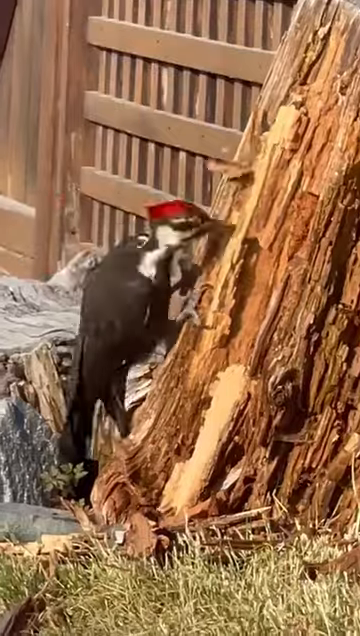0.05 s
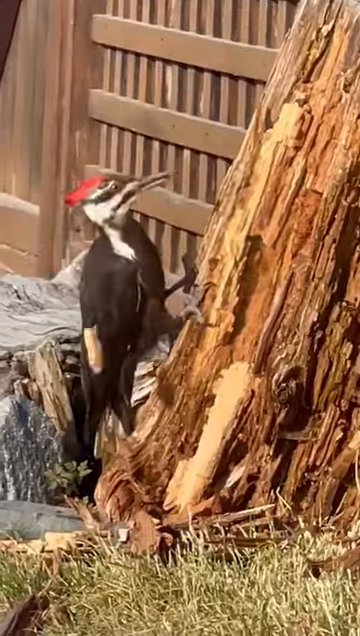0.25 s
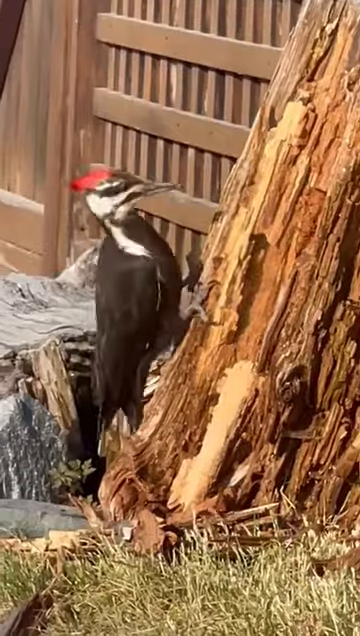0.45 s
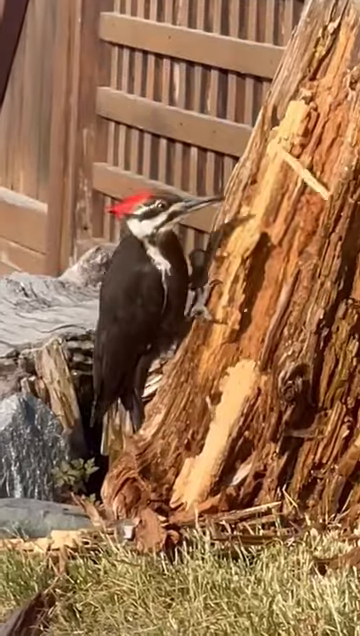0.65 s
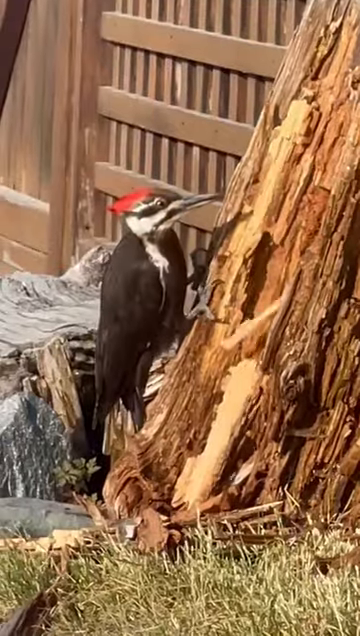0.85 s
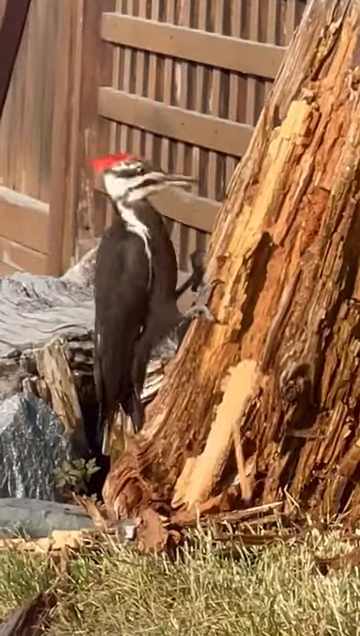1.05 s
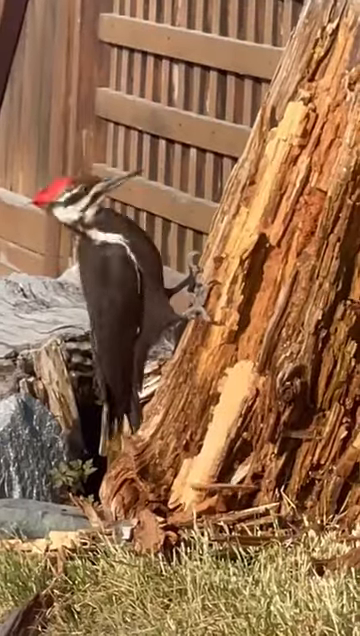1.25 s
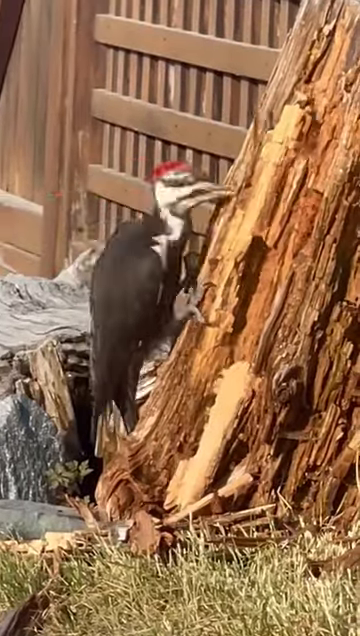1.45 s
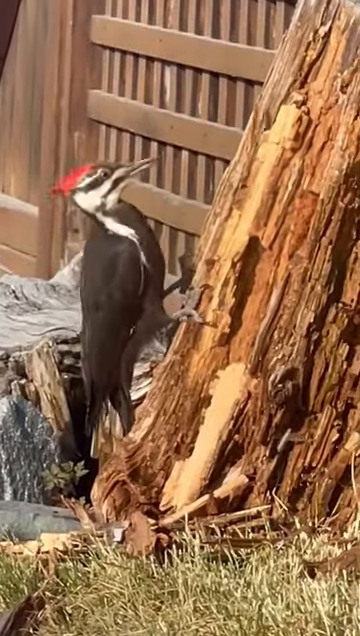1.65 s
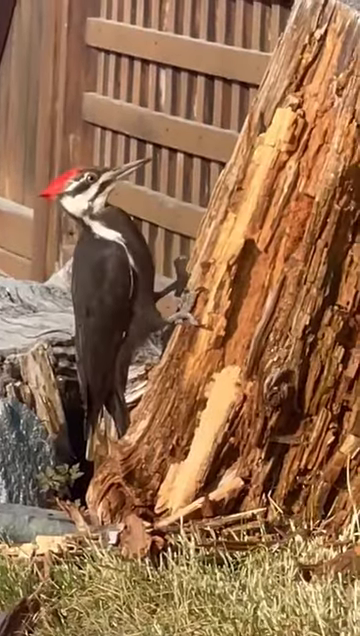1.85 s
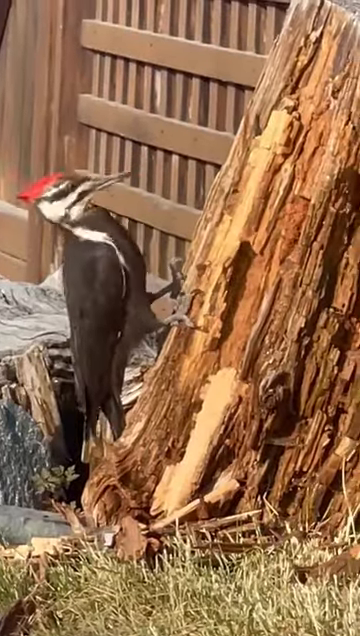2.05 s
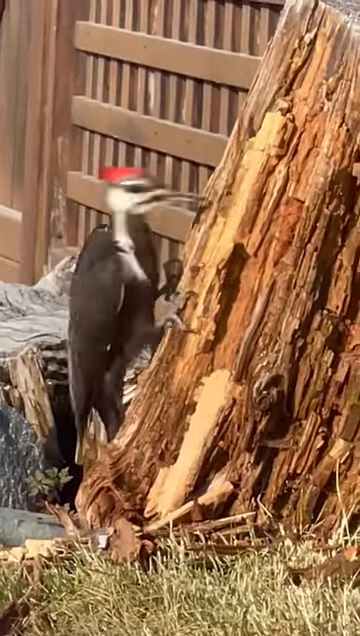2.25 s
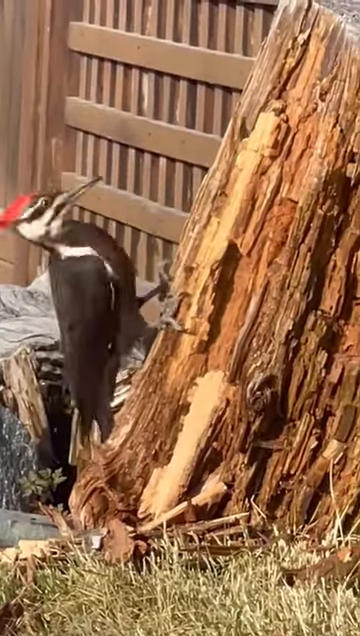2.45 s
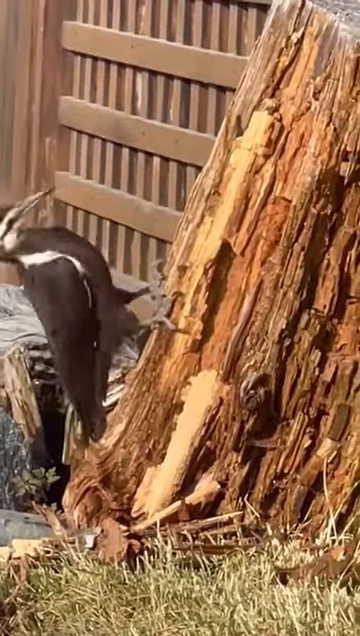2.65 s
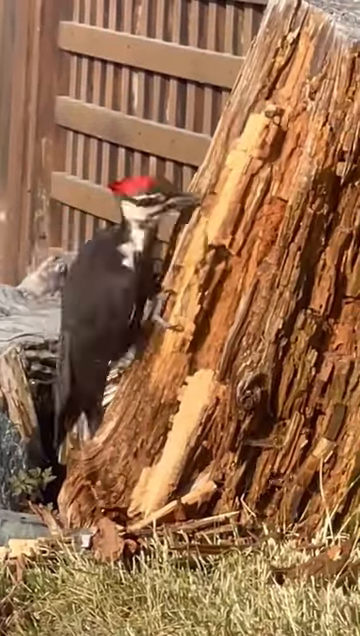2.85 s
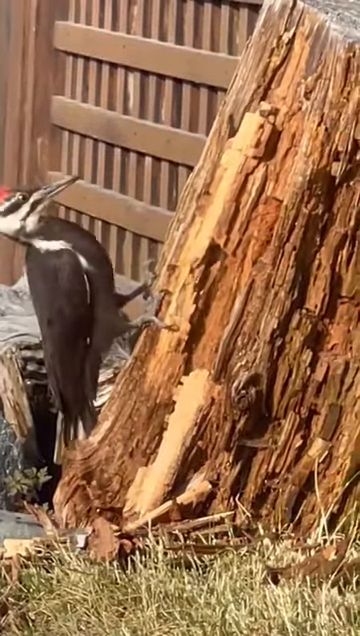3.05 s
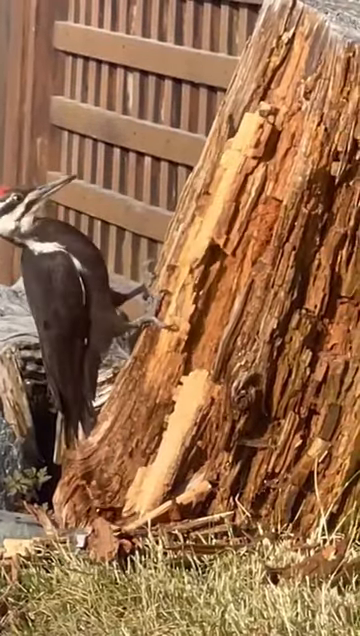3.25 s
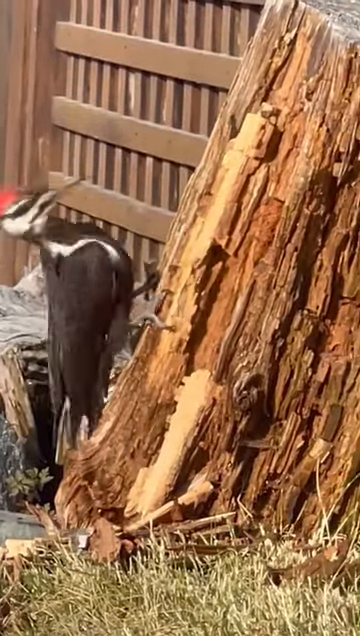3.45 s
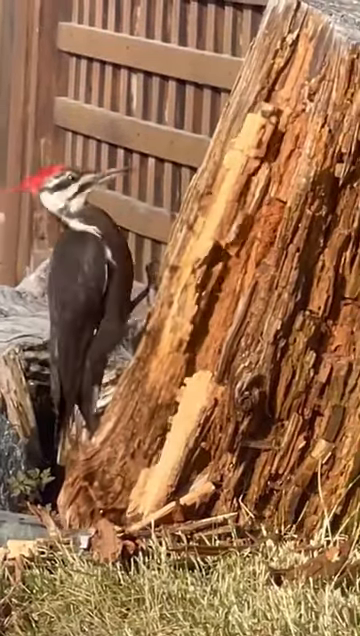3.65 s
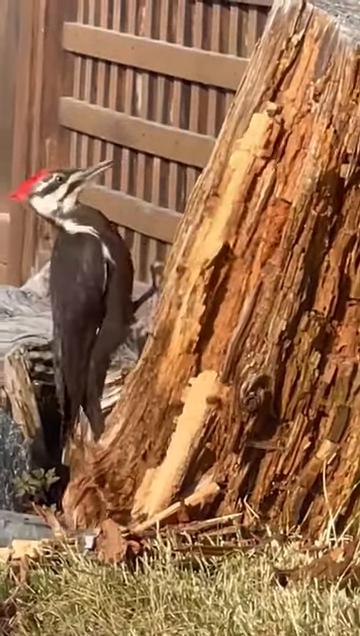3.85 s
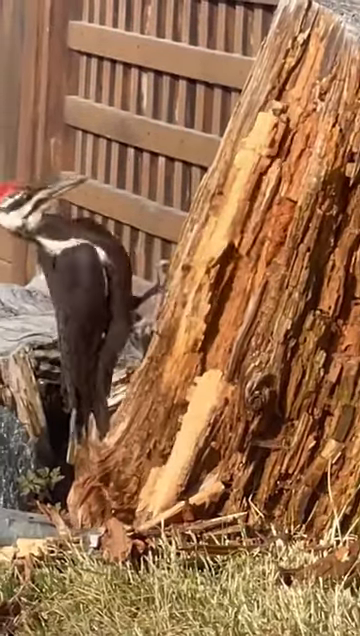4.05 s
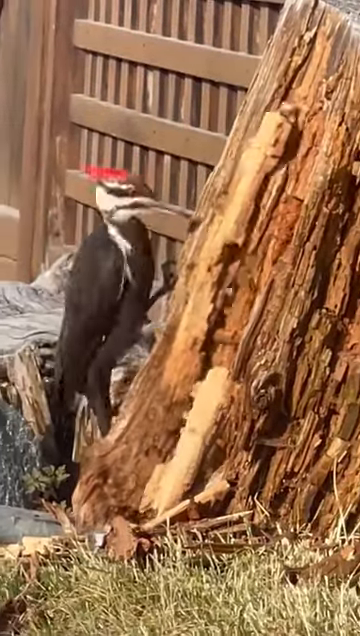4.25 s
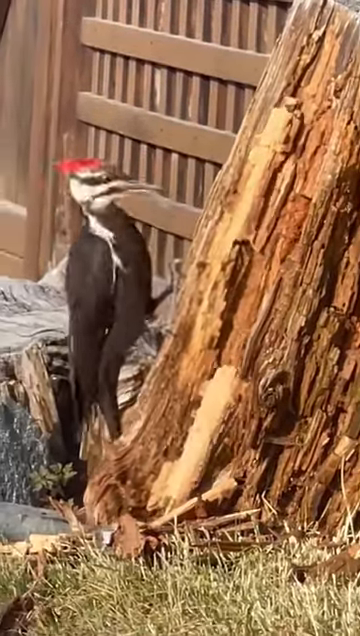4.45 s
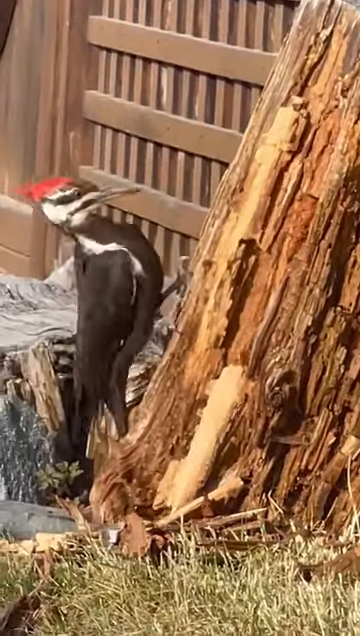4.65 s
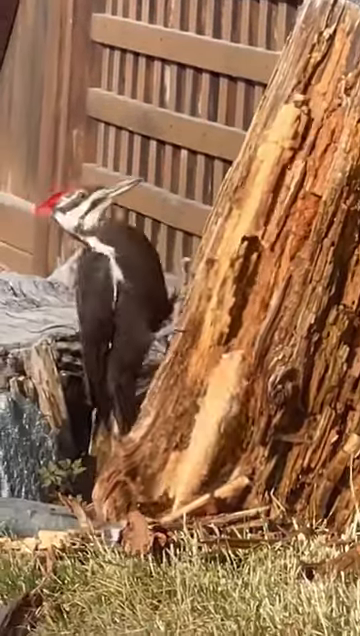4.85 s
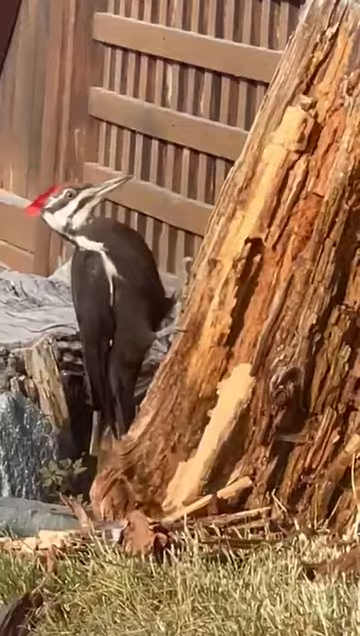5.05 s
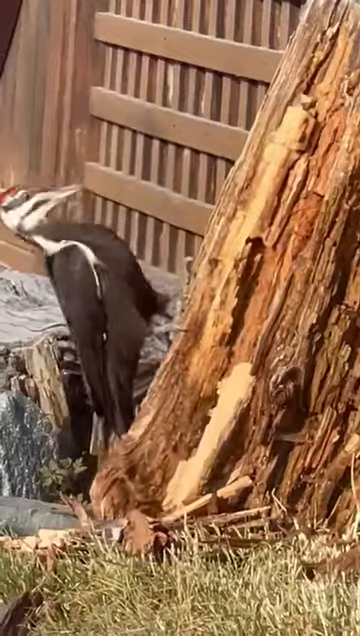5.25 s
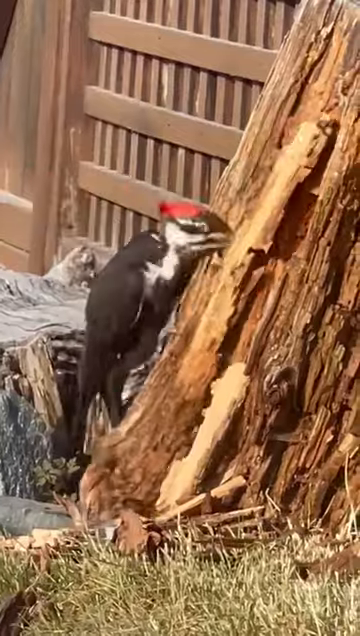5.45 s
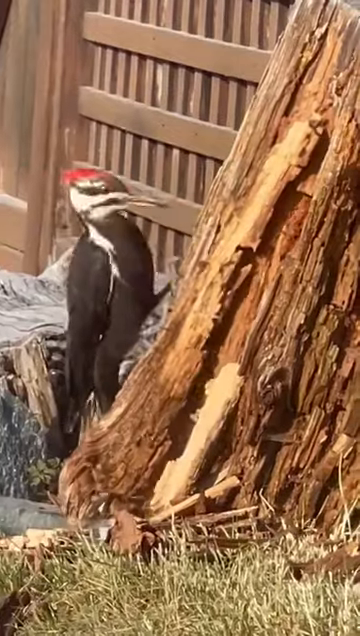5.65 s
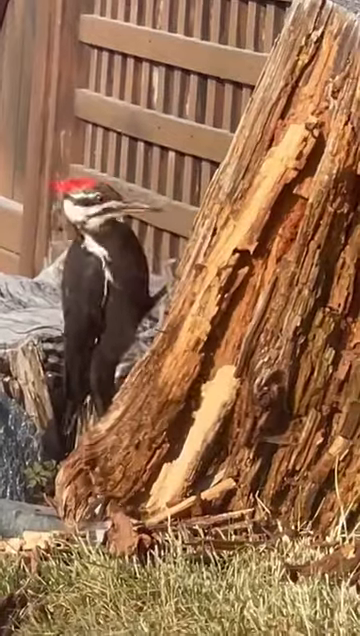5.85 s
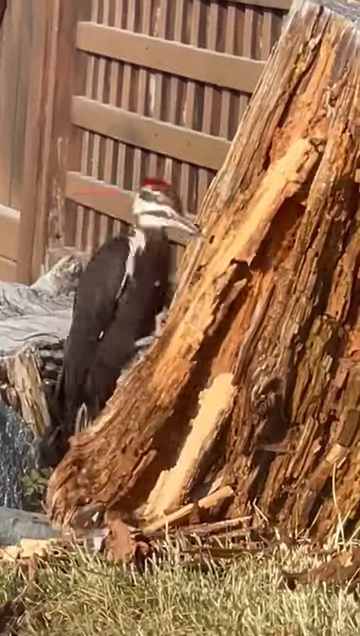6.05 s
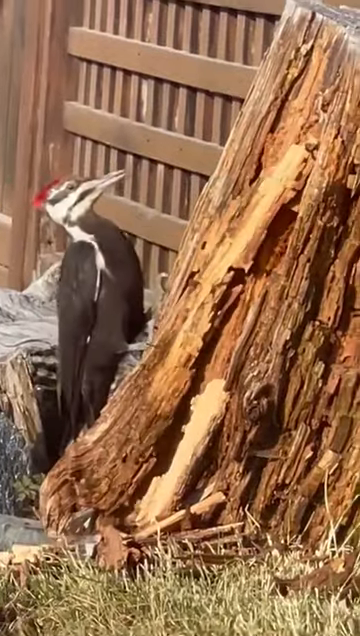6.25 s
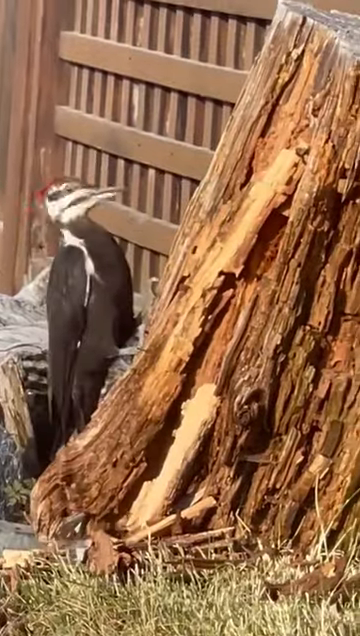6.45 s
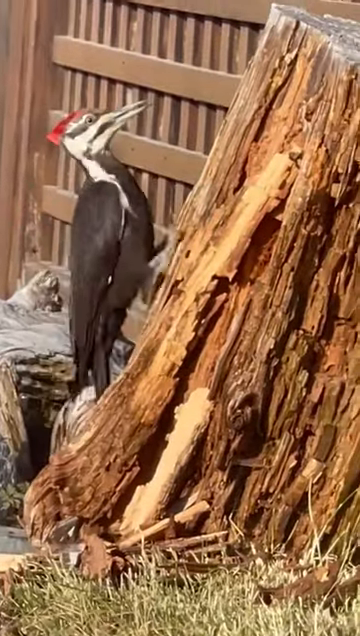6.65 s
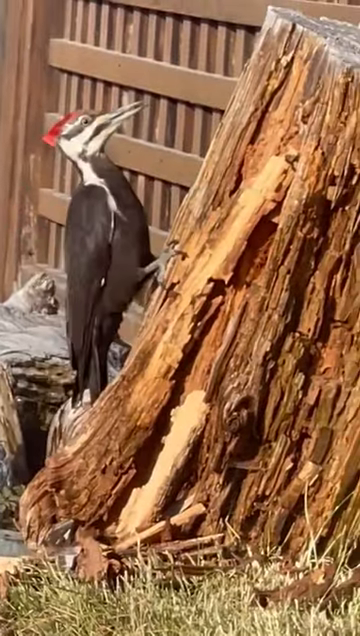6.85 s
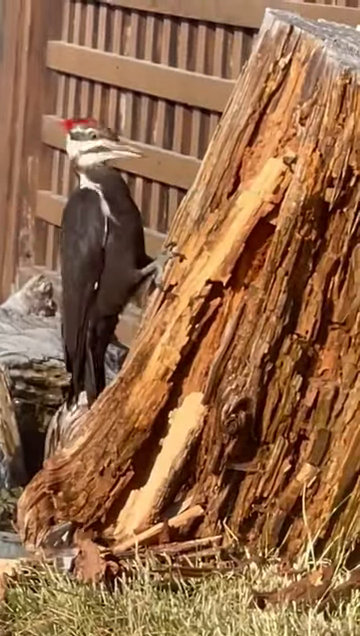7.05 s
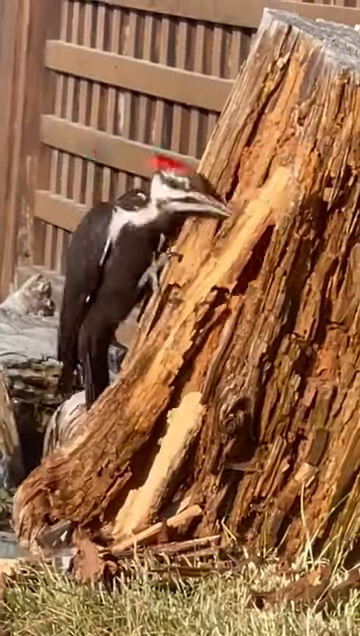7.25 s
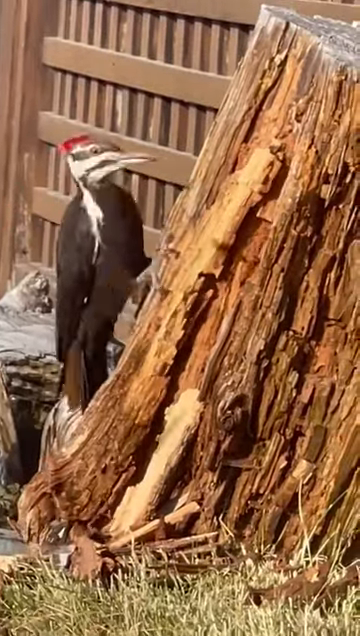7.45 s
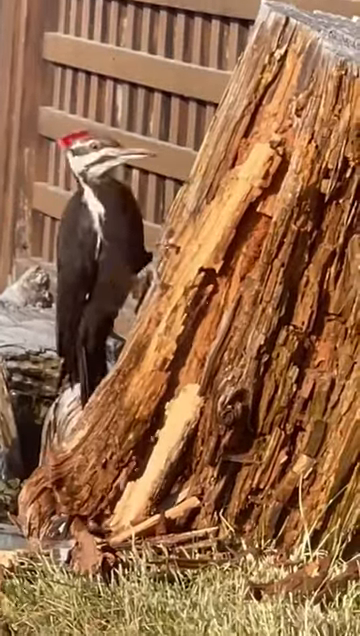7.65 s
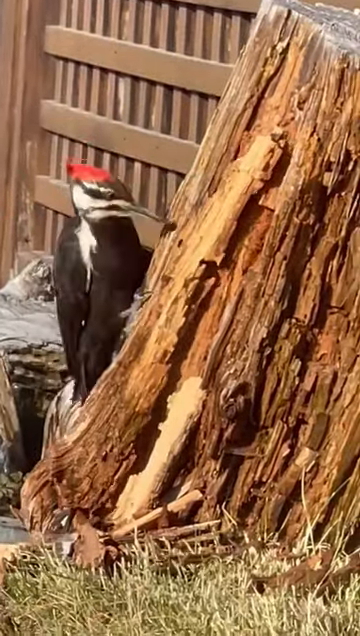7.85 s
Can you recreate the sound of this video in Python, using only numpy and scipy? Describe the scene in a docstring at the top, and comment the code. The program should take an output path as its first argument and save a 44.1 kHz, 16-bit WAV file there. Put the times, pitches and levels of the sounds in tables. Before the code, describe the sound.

In a quiet fenced yard, a large woodpecker chops a rotten stump a few metres from a hand-held phone. The hardest, brightest crack comes at 0.1 s, then a lighter peck at 0.6 with splintery ticks. A tiny tock falls near 1.0. Duller, solid knocks follow at 1.5 and 2.4, a bright double hit at 2.9, then blows at 3.6, 4.2, 4.8, 5.5 and a snappy cluster around 6.1. After a pause with faint ticks, a last weaker knock lands at 7.35. Each is short and damped, with fibres snapping, chips crumbling and trickling down, and a brief fence echo. Faint whistles pass between 1.3 and 3.5; a distant bird calls softly around 4.6-5.1, 6.2-6.6 and 7.3-7.9. Low breeze and faint murmur continue throughout, with a phone bump at 4.9 and soft hand rubs from 4.8 onward.

```python
"""A large woodpecker chops into a rotten stump in a fenced yard, a few metres from a hand-held phone.
Blows ring damped wood modes; snapping fibres and trickling crumbs are short shaped noise bursts.
The fence's echo is a train of sparse taps; a far bird, a short tock and faint whistles are gliding partials.
Behind them lie breeze rumble, a few nudges and rubs of the phone, and murmur, rustle and fizz of noise."""
import sys
import numpy as np
from scipy import signal
from scipy.fft import rfft, irfft, next_fast_len
from scipy.io import wavfile
from scipy.ndimage import uniform_filter1d

SR = 44100
rng = np.random.default_rng(int(sys.argv[2]) if len(sys.argv) > 2 else 0)


def master_out(mix):
    """Clip the mix to full scale and print it as 16-bit PCM to the path in sys.argv[1]."""
    frames = np.transpose(np.atleast_2d(mix))
    ceiling = np.clip(frames, -1, 1)
    pcm = np.round(ceiling * 32767).astype(np.int16)
    wavfile.write(sys.argv[1], SR, pcm)


def voltage_ratio(decibels):
    """Convert decibels (scalar or array-like) to amplitude ratios, 20 dB per decade."""
    exponent = np.asarray(decibels, float) / 20
    return 10 ** exponent


N = 348831  # length in samples


def evened(x):
    """Scale to an rms of one."""
    return x / np.sqrt(np.mean(x ** 2) + 1e-20)


def peaked(x):
    """Scale to a peak of one."""
    return x / (abs(x).max() + 1e-20)


def wandering(noise, span):
    """Smooth noise twice over span samples into a slow drift with an rms of one."""
    return evened(uniform_filter1d(uniform_filter1d(noise, span), span))


def read(points, hz):
    """Read a curve of (Hz, value) points along a logarithmic pitch axis."""
    f, value = np.transpose(points)
    return np.interp(np.log(hz + 1), np.log(f + 1), value)


def brightness_tilt(db_per_octave, hz):
    """Tilt a spectrum about 5 kHz, levelling off two octaves to either side."""
    return db_per_octave * np.clip(np.log2((hz + 1) / 5000), -2, 2)


def add(mix, start_s, sound):
    """Lay a sound into the mix in place."""
    part = mix[max(round(start_s * SR), 0):][:len(sound)]
    part += sound[:len(part)]


def spells(rows, t, falls=1):
    """Summed power of events that rise, then die away; falls multiplies the rate of dying."""
    start, rise, db, fall = np.transpose(rows)[:, :, None]
    rising = np.clip((t - start) / rise, 0, 1)
    falling = voltage_ratio(db - falls * fall * np.maximum(t - start - rise, 0))
    return ((rising * falling) ** 2).sum(0)


# bill meets wood: start_s, level_db, hardness_db_per_octave (about 400 Hz)
BLOWS = [(0.106, -20, 2), (0.445, -55, 8), (0.601, -40, 3), (1.523, -23.5, -4.5), (2.094, -53, -2.5),
         (2.356, -23.5, -.5), (2.908, -32.5, -0.5), (2.924, -22.5, 2), (3.58, -28, -3.5),
         (4.222, -31.5, -4), (4.231, -25, -2), (4.784, -34, -1), (5.518, -27.5, -2.5), (5.641, -47, 1),
         (6.06, -49, 0), (6.077, -37, -4.5), (6.111, -35.5, -4), (7.352, -34, -0.5)]
# damped modes of the stump: pitch_hz, level_db, t60_s
STUMP_MODES = [(87, -15, 0.17), (120, -8.5, 0.081), (154, -7.5, .12), (215.5, -2, 0.086),
               (277.6, 6.5, 0.04), (325, 1, .055), (370, -8, 0.04), (425.1, -2, 0.039), (511, 1.5, 0.016),
               (639, -0.5, 0.039), (734, -3.5, 0.029), (786, -3.5, 0.059), (977, -3, .03),
               (1128, -3.5, .03), (1230, -5, 0.0095), (1644, -5, 0.046), (1985, -2.5, 0.018),
               (2300, -5, 0.017)]


def knocks():
    """While the bill digs in, the damped modes of the stump are set off one by one; each spot tunes them anew."""
    dig_in_s = 0.002  # spread of the mode onsets
    out, t = np.zeros(N), np.arange(8192) / SR
    hz, mode_db, t60 = np.transpose(STUMP_MODES)[:, :, None]
    luck = rng.standard_normal((len(BLOWS), 4, len(STUMP_MODES), 1))
    for (start, db, hard_db), (shift, weight, side, wait) in zip(BLOWS, luck):
        spot_db = 1.8 * weight
        level_db = mode_db + hard_db * np.log2(hz / 400) + spot_db
        since = np.maximum(t - abs(wait) * dig_in_s, 0)
        spot_hz = hz * (1 + 0.019 * shift)
        fading = voltage_ratio(level_db - 60 * since / t60)
        rings = np.sign(side) * fading * np.sin(2 * np.pi * spot_hz * since)
        together = np.sqrt((voltage_ratio(level_db) ** 2).sum())  # modes out of step add as powers
        add(out, start, voltage_ratio(db) * rings.sum(0) / together)
    return out


# fibres snap, chips land, claws tick: start_s, peak_db, brightness_db_per_octave
SNAPS = [(0.1059, -10.5, 5.5), (0.4152, -41, 9.5), (0.4465, -63, -21), (0.466, -55, 3.5), (0.4983, -52, 16),
         (0.6019, -25, 6.5), (0.6085, -29, -2), (0.6148, -24, 7), (0.622, -41, 13), (0.6495, -44.5, -1.5),
         (0.8695, -48, -1.5), (0.985, -63.5, -16), (1.0028, -48.5, 10.5), (1.5235, -23.5, -2),
         (1.5337, -26, 14), (1.5739, -35.5, 1), (1.5992, -42.5, -1.5), (1.6511, -43, -1), (2.0865, -58, 0),
         (2.3563, -20, -1.5), (2.3668, -27, 13), (2.3928, -36.5, -8), (2.4092, -44, 0), (2.4174, -33, 2),
         (2.4591, -47.5, -3.5), (2.634, -55, -16), (2.9074, -25.5, 5), (2.9254, -19.5, 2.5),
         (2.934, -34.5, -2), (3.581, -25.5, -0.5), (3.5928, -30.5, -2), (3.6085, -32.5, 9.5),
         (3.6804, -43, -4), (3.6886, -42.5, 2), (3.7964, -50, -5.5), (4.1506, -53, 15),
         (4.2217, -35.5, -9.5), (4.2285, -25.5, 4), (4.2357, -31, -1), (4.274, -37.5, -2),
         (4.301, -46.5, 15), (4.3274, -53, 0), (4.3748, -38, -6), (4.3823, -54, -2), (4.4023, -52, -1),
         (4.4352, -50, -5.5), (4.5066, -52, -6), (4.613, -53, -9), (4.741, -54.5, -10), (4.785, -22, 1),
         (4.8156, -40.5, 6), (4.8558, -36, -2.5), (4.8667, -38, -7.5), (4.9344, -45.5, -3), (4.95, -54, -4),
         (5.5182, -27.5, -0.5), (5.532, -37, -3), (5.5453, -48, 16), (5.6168, -41.5, 20.5),
         (5.6279, -43, 4), (5.6416, -50.5, 4), (5.6572, -47, 2), (5.7527, -58.5, 0.5), (5.87, -59.5, 6),
         (6.0791, -35.5, 2), (6.0964, -15, 3.5), (6.111, -43.5, -12.5), (6.141, -40.5, 3),
         (6.1773, -51, -7.5), (6.705, -50.5, -6.5), (6.7515, -45.5, -4), (6.7628, -44, 4),
         (6.7976, -45, -7), (7.12, -63, 6), (7.2543, -52.5, -10.5), (7.328, -52, -8), (7.346, -28, -2),
         (7.3557, -31, 0.5), (7.4078, -43.5, 6.5), (7.4137, -38, 8.5), (7.48, -56.5, -0.5),
         (7.565, -62.5, -9.5), (7.655, -50.5, 23.5), (7.794, -47.5, 3), (7.8194, -52.5, 2),
         (7.8741, -42, -2.5)]
# spectrum of a snap before its tilt: pitch_hz, level_db
SNAP_COLOUR = [(500, -14.5), (1500, -5.5), (3000, -1), (5500, 0), (7000, -8), (10000, 5), (11300, -3),
               (12500, -46.5)]


def snaps():
    """Each snap is a quick-rising burst of uneven crackle, tilted bright or dull."""
    out, t, hz = np.zeros(N), np.arange(4096) / SR, np.fft.rfftfreq(4096, 1 / SR)
    rows = SNAPS + trickle()
    noise = rng.standard_normal((len(rows), 2, 4096))
    for (start, db, bright_db), (crackle, lumps) in zip(rows, noise):
        t60 = max(0.012 * (1.5 - 0.09 * bright_db), 0.003)  # seconds; a duller snap rings longer
        patchy_db = 3.2 * wandering(lumps[:len(hz)], 40)  # every splinter has its own ring
        colour_db = read(SNAP_COLOUR, hz) + brightness_tilt(bright_db, hz) + patchy_db
        burst = irfft(rfft(crackle) * voltage_ratio(colour_db))
        envelope = (1 - np.exp(-t / 0.00058)) * voltage_ratio(-60 * t / t60)
        add(out, start, voltage_ratio(db) * peaked(burst * envelope))
    return out


# loose chips slide down the stump into the grass: start_s, rise_s, rustle_level_db, fall_db_per_s
SLIDES = [(0, 0.0081, -85, 58), (1.25, 0.23, -90, 20), (2.2, 0.11, -90, 12), (3.65, 0.14, -81.5, 51.5),
          (4.27, .08, -77.5, 33.5), (4.82, 0.11, -76, 120), (4.5, 0.083, -93, 30), (5.02, 0.023, -82, 55),
          (5.28, 0.035, -96, 74.5), (5.5, 0.047, -79, 59.5), (6.15, 0.036, -90.5, 32), (6.5, 0.06, -85, 51),
          (7.2, 0.097, -90.5, 42)]


def slides(t):
    """Power of the sliding chips, each slide rising and then dying away."""
    return spells(SLIDES, t)


def trickle():
    """Stray crumbs at random moments, their loudness following the slide they fall from."""
    per_s, over_slide_db, spread_db, tilt_db = 70, 16, 3.5, 11
    when, size, tilt = rng.random((round(per_s * N / SR), 3)).T
    start = when * N / SR
    slide_db = 10 * np.log10(slides(start) + 1e-12)
    db = slide_db + over_slide_db - spread_db * np.log(size + .02)
    return list(zip(start, db, tilt_db * (2 * tilt - 1)))


# rotten wood crumbling after a blow or under the claws:
# start_s, starting_level_db, length_s, fall_db over the length (negative swells), brightness_db_per_octave
CRUMBLES = [(0.094, -41, .15, 38, -2.5), (.4, -71.5, 0.072, 6.5, -1.5), (0.598, -48, .18, 40.5, -2.5),
            (1.524, -46.5, .11, 25, -3.5), (2.356, -50, .1, 17, -4), (2.906, -40.5, .14, 35.5, -2.5),
            (3.581, -51, 0.18, 22, -2.5), (4.224, -47.5, 0.14, 25, -0.5), (4.785, -50, 0.043, -3, -1),
            (5.517, -51.5, 0.19, 28, -1), (6.074, -50.5, .17, 25, -2), (6.74, -67, 0.1, 11.5, -1.5),
            (7.243, -64, .0284, 9.5, 1), (7.343, -47.5, .088, 20, 0.5), (7.635, -74.5, .071, 1, 0.5),
            (7.785, -74.5, .18, -14.5, 1.5)]
# spectrum of the crumbling before its tilt: pitch_hz, level_db
CRUMB_COLOUR = [(150, -24), (350, 12.5), (800, 2), (1600, 0.5), (3000, -3), (5500, -1), (7000, -5),
                (10000, 4.5), (11300, 0.5), (12500, -32)]


def crumbles():
    """A dense hiss of splinters with lumps of a few milliseconds; its level slides, then it stops."""
    out, hz = np.zeros(N), np.fft.rfftfreq(8192, 1 / SR)
    noise = rng.standard_normal((len(CRUMBLES), 2, 8192))
    for (start, db, length, fall_db, bright_db), (splinters, lumps) in zip(CRUMBLES, noise):
        colour_db = read(CRUMB_COLOUR, hz) + brightness_tilt(bright_db, hz)
        hiss = evened(irfft(rfft(splinters) * voltage_ratio(colour_db)))
        u = np.arange(8192) / SR / length  # share of the length gone by
        lumps_db = 2.8 * evened(uniform_filter1d(lumps, 150))
        fade = np.clip(u / 0.044, 0, 1) * np.clip((1 - u) / 0.059, 0, 1)
        add(out, start, hiss * voltage_ratio(db - fall_db * u + lumps_db) * fade)
    return out


# how fast the yard's echo dies: pitch_hz, t60_s
YARD_DECAY = [(100, 0.62), (300, 0.19), (1000, 0.15), (3000, 0.17), (10000, 0.08)]


def yard(x):
    """Fence and walls: sparse taps of random sign, each band dying at its own speed; part comes from the sides."""
    apart = 0.22  # weight of the echo that differs between left and right
    taps = np.zeros((2, SR // 2))
    at = np.arange(300, SR // 2 - 20, 20)  # samples; one tap at random in each slot
    spots = at + rng.integers(0, 20, (len(at), 2)).T
    signs = rng.choice([-1., 1.], (len(at), 2)).T
    np.put_along_axis(taps, spots, signs, axis=1)
    hz, t, z = signal.stft(taps, SR, nperseg=256)
    t60 = np.maximum(read(YARD_DECAY, hz), .02)[:, None]
    mid, side = signal.istft(z * voltage_ratio(-60 * t / t60), SR, nperseg=256)[1]
    # bass stays in the middle
    side = signal.sosfilt(signal.butter(2, 400, "high", fs=SR, output="sos"), side)
    tail = np.array([mid + apart * side, mid - apart * side]) / np.linalg.norm(mid)
    return voltage_ratio(-15.5) * signal.fftconvolve(x[None], tail, axes=1)[:, :N]


def gliding_tone(rows, partials):
    """Partials on a gliding pitch, each wavering in level."""
    start, *columns = np.transpose(rows)
    t = np.arange(start[0], start[-1], 1 / SR)
    hz, db = (np.interp(t, start, column) for column in columns)
    waver_db = 2.5 * wandering(rng.standard_normal((len(partials), len(t))), 400)
    turns = np.cumsum(hz) / SR
    tone = 0
    for (ratio, part_db), sway_db in zip(partials, waver_db):
        tone = tone + voltage_ratio(part_db + sway_db) * np.sin(2 * np.pi * ratio * turns)
    return start[0], np.sqrt(2) * voltage_ratio(db) * tone * signal.windows.tukey(len(t), .1)


# far bird, one list a call: time_s, pitch_hz (strongest partial), level_db
BIRD_CALLS = [
    [(4.59, 1860, -62.5), (4.67, 1762, -75.5), (4.79, 1850, -66), (4.9, 1875, -68), (4.97, 1878, -64),
     (5.02, 1860, -67.5), (5.07, 1610, -71)],
    [(6.22, 1857, -77), (6.26, 1838, -72.5), (6.49, 1859, -68), (6.525, 1735, -71), (6.56, 1870, -75),
     (6.63, 1890, -85)],
    [(7.25, 1852, -72.5), (7.35, 1835, -65.5), (7.47, 1873, -68.5), (7.55, 1923, -62), (7.6, 1984, -68.5),
     (7.66, 1940, -77), (7.75, 1925, -66), (7.91, 1964, -72)],
]
# per call, against the strongest partial: lowest_partial_db (half its pitch), top_partial_db (1.5 times)
CALL_PARTIALS = [(-9.5, -23), (-8.5, -12.5), (-8.5, -26.5)]


def far_bird():
    """Each call is three partials on one gliding pitch, fading in and out on the moving air."""
    out = np.zeros(N)
    for rows, (low_db, top_db) in zip(BIRD_CALLS, CALL_PARTIALS):
        add(out, *gliding_tone(rows, [(.5, low_db), (1, 0), (1.5, top_db)]))
    return out


# faint whistles, and first a short tock falling through about 900 Hz:
# start_s, length_s, start_hz, middle_hz, end_hz, middle_level_db
TOCK_AND_WHISTLES = [(1.04, 0.01, 1050, 870, 750, -64), (1.302, .12, 1630, 1706, 1740, -78.5),
                     (1.816, .05, 1760, 1790, 1840, -79.5), (2.488, 0.1, 1420, 1420, 1420, -95),
                     (2.55, 0.13, 2820, 2860, 2830, -89), (2.995, .13, 2630, 2690, 2490, -78.5),
                     (3.4, 0.16, 2560, 2720, 2560, -87.5)]


def tock_and_whistles():
    """A single wavering partial swells 5 dB to its middle and sinks again while its pitch glides or holds."""
    out = np.zeros(N)
    for start, length, start_hz, middle_hz, end_hz, db in TOCK_AND_WHISTLES:
        arch = [(start, start_hz, db - 5), (start + length / 2, middle_hz, db), (start + length, end_hz, db - 5)]
        add(out, *gliding_tone(arch, [(1, 0)]))
    return out


# nudges of the phone: start_s, strength_db, contact_s (width of the push)
NUDGES = [(4.911, -27.5, 0.00037), (5.422, -53, 0.00076), (5.612, -36, 0.00086), (5.867, -42.5, 0.00064)]


def nudges():
    """A blunt bell-shaped push on the phone's body, which rocks briefly at 120 Hz."""
    out, t = np.zeros(N), np.arange(2048) / SR
    rock = 0.46 * np.sin(2 * np.pi * 120 * t) * np.exp(-t / 0.018)
    for start, db, contact in NUDGES:
        push = 1.66 * np.exp(-.5 * ((t - .0015) / contact) ** 2)
        add(out, start, voltage_ratio(db) * (push + rock))
    return out


# the hand shifts on the phone: start_s, rise_s, rumble_level_db, rumble_fall_db_per_s, scrape_level_db
RUBS = [(4.82, 0.097, -49, 198, -65), (5.0, .06, -50, 29.5, -60), (5.3, 0.015, -57.5, 59.5, -89),
        (5.52, 0.062, -56, 84, -65), (5.72, 0.031, -58.5, 39.5, -69), (6.18, .05, -58.5, 80, -69.5),
        (7.119, .1, -59, 9.5, -72)]


def rub_rumble(t):
    """Power of the low rumble in each rub of the hand."""
    return spells([row[:4] for row in RUBS], t)


def rub_scrape(t):
    """Power of the scrape in each rub, dying 2.2 times as fast as its rumble."""
    rows = [(start, rise, scrape_db, fall) for start, rise, _, fall, scrape_db in RUBS]
    return spells(rows, t, falls=2.2)


# the breeze at the phone: time_s, rumble_level_db
BREEZE = [(0, -67.5), (.2, -60.5), (.72, -68.5), (1, -61.5), (1.3, -69), (1.55, -62), (1.72, -65),
          (1.95, -63.5), (2.5, -64), (2.85, -69), (3.1, -65), (4.1, -67), (4.35, -60), (4.6, -67.5),
          (6.1, -68), (6.65, -63), (7.05, -66.5), (7.91, -76.5)]
# spectrum of the rumble: pitch_hz, relative_level_db
RUMBLE_COLOUR = [(20, -16), (35, -5), (60, 6), (85, -1), (120, -3), (180, -9.5), (300, -26.5), (500, -55.5)]


def wind():
    """Lumpy low noise of breeze and hand, nearly alike at both ports."""
    apart = .03  # weight of the rumble that differs between the ports
    t = np.arange(N) / SR
    breeze = voltage_ratio(np.interp(t, *np.transpose(BREEZE))) ** 2
    level = np.sqrt(breeze + rub_rumble(t))
    shared, differing, lumps = rng.standard_normal((N, 3)).T
    ports = np.array([shared + apart * differing, shared - apart * differing])
    colour = voltage_ratio(read(RUMBLE_COLOUR, np.fft.rfftfreq(N, 1 / SR)))
    low = evened(irfft(rfft(ports) * colour, N))
    lumps_db = 1.5 * wandering(lumps, 2000)
    return low * level * voltage_ratio(lumps_db)


# far murmur of the yard swelling and sinking: time_s, level_db
YARD_MURMUR = [(0, -76.5), (.8, -81), (1.4, -75.5), (2.1, -78), (2.9, -80), (3.75, -77.5), (4.1, -79),
               (4.7, -73), (5.45, -81.5), (6.2, -72), (6.85, -78), (7.25, -73), (7.91, -81.5)]
# spectra of murmur, rustle and fizz: pitch_hz, relative_level_db
MURMUR_COLOUR = [(120, -24), (250, 1.5), (500, -4), (1000, -6), (1800, -15.5), (2800, -23.5), (5000, -49.5)]
RUSTLE_COLOUR = [(1000, -25), (2000, 3), (3000, -1.5), (5000, -2), (7000, -14.5), (9000, -24.5)]
FIZZ_COLOUR = [(4000, -25), (6000, -6.5), (8000, -8.5), (10000, -1.5), (11300, -5.5), (12200, -36)]
# left-right likeness of the air: pitch_hz, likeness (1 = the same)
LIKENESS = [(60, 1), (130, 1), (270, 0.67), (580, 0.084), (1230, 0.033), (1900, 1), (3000, 1)]


def air():
    """Random short-time spectra: murmur, rustle and fizz on their own levels, patchy and flickering."""
    frames, hz = N // 128 + 5, np.fft.rfftfreq(512, 1 / SR)
    t = np.arange(frames) * 128 / SR
    a, b, c, d, patches = rng.standard_normal((frames, 257, 5)).T
    patches = evened(uniform_filter1d(uniform_filter1d(patches, 6, 0), 20, 1))
    crumbs = np.minimum(rng.exponential(1, frames), 4)  # single crumbs lift the treble for an instant

    far = voltage_ratio(np.interp(t, *np.transpose(YARD_MURMUR))) ** 2
    sliding = slides(t)
    murmur = far + rub_scrape(t) + sliding * voltage_ratio(2.5) ** 2  # slides thud too
    rustle = far * voltage_ratio(-16) ** 2 + sliding  # leaves rustle along with the murmur
    fizz = voltage_ratio(-94) ** 2 + sliding * voltage_ratio(-12.5) ** 2  # steady fizz and the dust of slides
    murmur_db, rustle_db, fizz_db = 10 * np.log10([murmur, rustle, fizz])

    layers = [(MURMUR_COLOUR, murmur_db),
              (RUSTLE_COLOUR, rustle_db + 1.5 * crumbs),
              (FIZZ_COLOUR, fizz_db + 2.9 * crumbs)]
    power = 0
    for colour, db in layers:
        shape = evened(voltage_ratio(read(colour, hz)))[:, None]
        power = power + (shape * voltage_ratio(db)) ** 2

    same = np.clip(read(LIKENESS, hz), -1, 1)[:, None]
    left = a + 1j * b
    right = same * left + np.sqrt(1 - same ** 2) * (c + 1j * d)
    patchy_db = 2.2 * patches
    z = np.array([left, right]) * np.sqrt(power) * voltage_ratio(patchy_db - 19.0)
    return signal.istft(z, nperseg=512, noverlap=384)[1][:, :N]


def scene():
    """Stump, bird, tock and whistles arrive from the front with the yard's echo around them; the air is wider."""
    front = knocks() + snaps() + far_bird() + tock_and_whistles()
    solid = front + yard(front) + crumbles() + nudges()
    small = signal.butter(3, 85, "high", fs=SR, output="sos")  # small bodies radiate no deep bass
    return signal.sosfilt(small, solid) + wind() + air()


def roll_off(x):
    """The treble ends steeply here."""
    return signal.sosfilt(signal.butter(12, 12440, fs=SR, output="sos"), x)


# phase between the two ports: pitch_hz, left_lead_radians
PORT_LEAD = [(0, 0), (450, 0), (900, .5), (1400, 0), (1900, 0), (2600, .55), (4000, .5), (4900, 3.14),
             (5500, 6.1), (6700, 6.8), (8000, 8.7), (9500, 9.5), (11000, 11.3), (11700, 12.0),
             (12500, 12.2)]
# level between the two ports: pitch_hz, left_over_right_db
PORT_BALANCE = [(25, -.3), (60, -.3), (130, -.7), (250, -2.2), (520, -5.5), (900, -2.5), (1400, 0),
                (12000, 0)]


def record(dry):
    """The phone's filters cut the deepest bass, delay the low end and turn the two ports against each other."""
    size = next_fast_len(N + SR)
    hz = np.fft.rfftfreq(size, 1 / SR)
    bass_lag = 2 * np.pi * 1.6 * np.log(np.minimum(hz, 1600) / 35 + 1)  # delay is 1.6 / (hz + 35) s
    bass_cut = 1 / np.sqrt(1 + (38 / (hz + 1)) ** 4)
    side = np.array([[.5], [-.5]])  # left and right share each difference
    balance = voltage_ratio(side * read(PORT_BALANCE, hz))
    lead = side * np.interp(hz, *np.transpose(PORT_LEAD))
    ports = bass_cut * balance * np.exp(1j * (lead - bass_lag))
    mix = irfft(rfft(dry, size) * ports, size)[:, :N]
    return roll_off(mix)


dry = scene()
out = record(dry)
master_out(out)
```